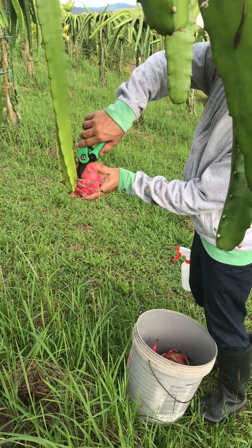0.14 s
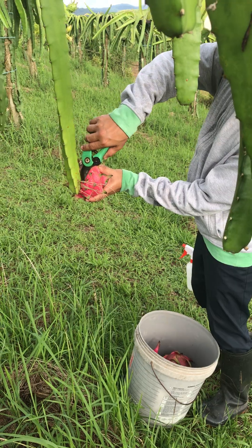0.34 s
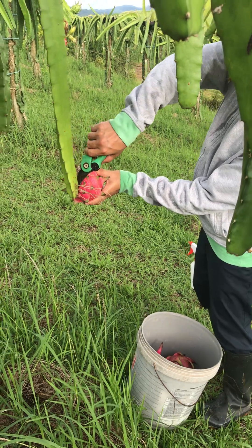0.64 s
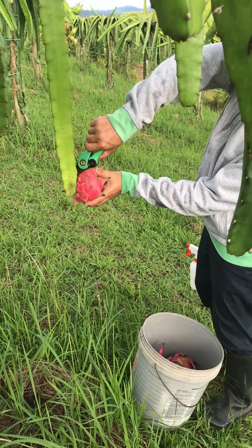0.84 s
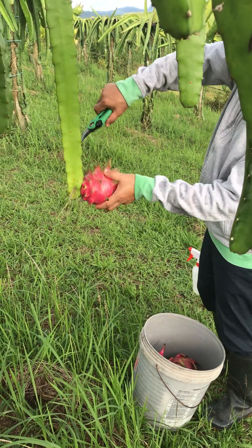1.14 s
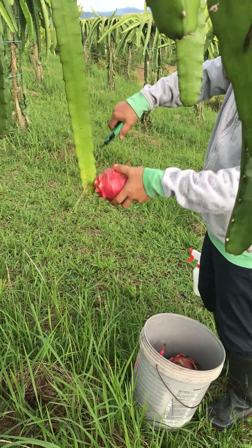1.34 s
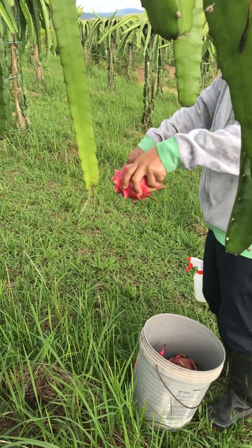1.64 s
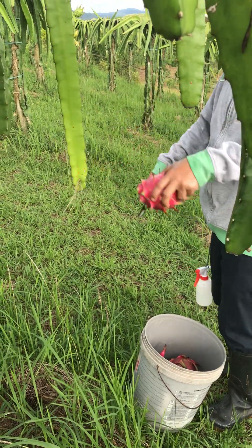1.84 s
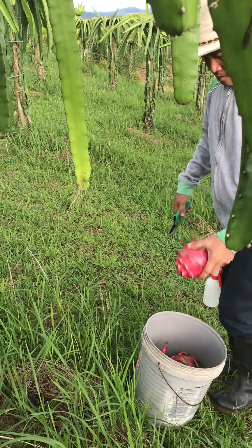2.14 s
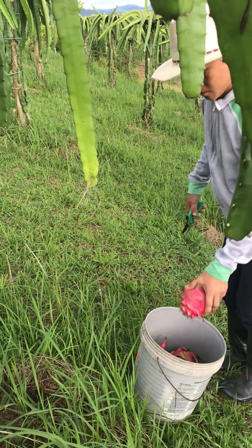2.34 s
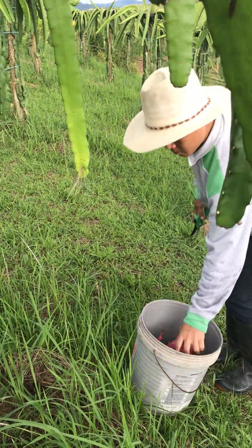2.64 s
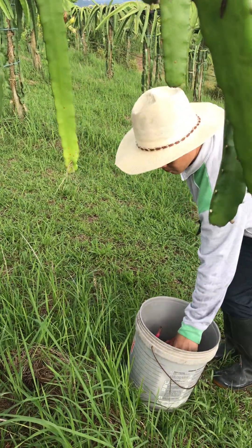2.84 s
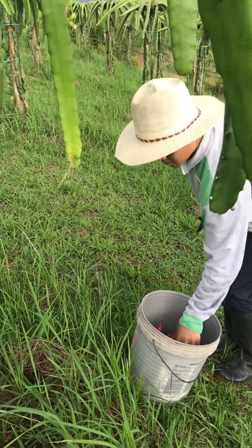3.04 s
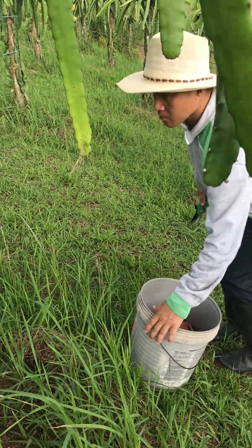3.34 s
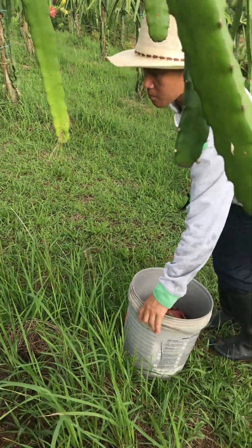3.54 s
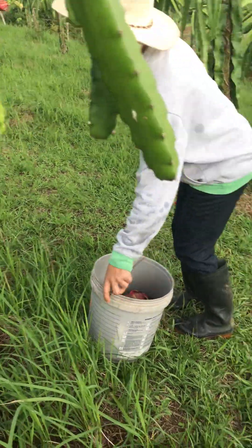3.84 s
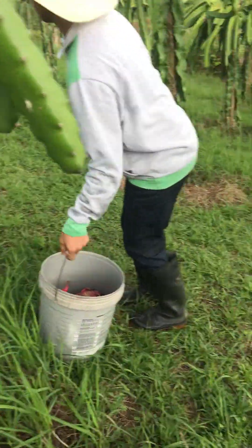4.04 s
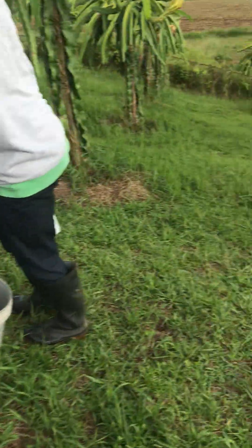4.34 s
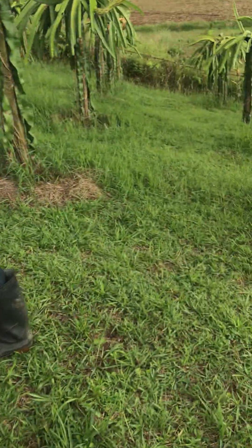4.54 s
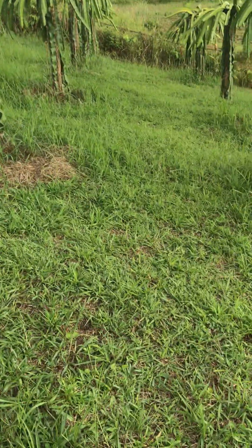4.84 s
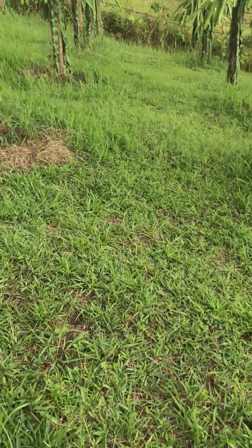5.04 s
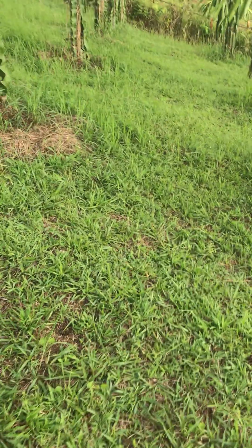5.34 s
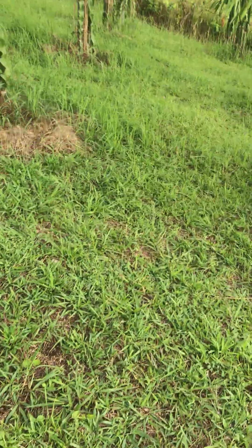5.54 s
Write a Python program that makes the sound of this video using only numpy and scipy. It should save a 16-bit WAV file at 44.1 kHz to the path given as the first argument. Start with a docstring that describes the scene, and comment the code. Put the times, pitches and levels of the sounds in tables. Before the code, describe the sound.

Outdoors in a quiet, insect-shrill field, shears make small crisp ticks, then a loud, slightly wet snap through a fruit stem. A nearby bird sings a quick fluttering phrase three times. Fruit and hand touch a plastic bucket with soft dull knocks, the handle clacks, and sleeves and boots swish through grass, getting closer. A single handheld microphone catches low breeze rumble.

```python
"""Pruning shears crack through a fruit stem in a quiet field: decaying tones and noise splinters over a wet crunch.
The fruit goes into a plastic bucket, whose handle is lifted; knocks and rubbing ring its wall modes.
A bird calls three times among fainter ones, all gliding sines with a trembling pitch.
Insects shrill, and sleeves and boots rustle through the grass: shaped noise and dense clicks.
A light breeze rumbles on the single microphone as swelling low noise."""
import sys
import numpy as np
from scipy import signal
from scipy.fft import rfft, irfft, next_fast_len
from scipy.io import wavfile
from scipy.ndimage import uniform_filter1d, map_coordinates

SR = 44100
rng = np.random.default_rng(int(sys.argv[2]) if len(sys.argv) > 2 else 0)


def put_to_file(sound):
    """Save the sound as 16-bit audio at rate SR, in the file named by the first command-line argument."""
    columns = np.atleast_2d(sound).T  # one column per channel
    safe = np.clip(columns, -1, 1)
    whole_steps = np.round(safe * 32767)
    wavfile.write(sys.argv[1], SR, whole_steps.astype(np.int16))


N = 251350

# cracks of stem and blades: [t/s, ring level/dB, ring f/Hz, splinter trim/dB, lowest strong f/Hz]
CRACKS = [(0.6135, -21.5, 7600, 4, 2100), (0.6167, -22, 2220, 3, 1880), (0.7681, -21.5, 7170, -4, 2060),
          (.8193, -31.5, 8100, 4, 6000), (0.8345, -26.5, 6960, 6.5, 2200), (0.8367, -25.5, 6900, 10, 2460),
          (0.84, -19, 6860, 6, 2780), (0.8409, -10.5, 2840, 0, 2370), (0.8434, -21.5, 4300, 6, 2700),
          (1.5101, -32.5, 4260, 6.5, 1130)]
PARTING_S = max(CRACKS, key=lambda crack: crack[1])[0]  # the loudest crack severs the stem
# modes of the bucket wall: [f/Hz, relative level/dB, t60/s]
BUCKET_MODES = [(272.6, 2.5, 0.032), (486, -25, 0.01), (674, -7, 0.052), (947, -5, 0.031),
                (1101, -4, 0.044), (1420, 9.5, 0.0084), (1610, -18.5, 0.0065), (1950, -6, 0.01),
                (2380, -11.5, 0.029), (3010, 7.5, 0.0026), (3580, 0, 0.01)]


def amp(db):
    """Amplitude factor of a level in dB."""
    return 10 ** (np.asarray(db) / 20)


def unit(x):
    """x at rms 1."""
    return x / np.sqrt(np.mean(x ** 2) + 1e-20)


def wobble(rate):
    """A smooth random curve, rate knots a second."""
    return map_coordinates(rng.standard_normal(int(N * rate / SR) + 4), [np.arange(N) * rate / SR])


def filtered(x, response):
    """x times a response of frequency."""
    m = next_fast_len(N + SR // 2)
    return irfft(rfft(x, m) * response(np.fft.rfftfreq(m, 1 / SR)), m)[:N]


def coloured(x, spectrum):
    """x shaped by (Hz, dB) points, at rms 1."""
    f, db = np.transpose(spectrum)
    return unit(filtered(x, lambda hz: amp(np.interp(np.log(hz + 1), np.log(f), db))))


def noise(spectrum):
    """Coloured noise of rms 1."""
    return coloured(rng.standard_normal(N), spectrum)


def band(x, low_hz, high_hz, order):
    """x between two gentle edges."""
    edges = [min(low_hz, .9 * high_hz), min(high_hz, .48 * SR)]
    return signal.sosfilt(signal.butter(order, edges, "band", fs=SR, output="sos"), x)


def add(track, s, sound):
    """Mix a sound into the track at time s."""
    part = track[max(round(s * SR), 0):][:len(sound)]
    part += sound[:len(part)]


def fade(t, t60):
    """Free decay, 60 dB down after t60."""
    return np.exp(-np.log(1000) * t / t60)


def burst(t, t60):
    """A dying puff of noise of steady strength."""
    shape = fade(t, t60)
    puff = shape * rng.standard_normal(len(t))
    return puff * np.linalg.norm(shape) / np.linalg.norm(puff)


def scatter(x, t60, delay, top_hz):
    """Diffuse echo from ground and plants, duller than its source."""
    t = np.arange(SR // 2) / SR
    tail = burst(t, t60)
    delayed_tail = np.pad(tail / np.linalg.norm(tail), (round(delay * SR), 0))
    echo = signal.fftconvolve(x, delayed_tail)[:N]
    return filtered(echo, lambda hz: 1 / np.hypot(1, hz / top_hz))


def swells(rows):
    """Summed strength of (start, rise, fall, dB) swells; each climbs 20 dB in its rise and loses 20 dB in its fall."""
    t = np.arange(N) / SR
    power = np.zeros(N)
    for s, rise, fall, db in rows:
        peak = s + rise
        distance = np.abs(np.maximum((peak - t) / rise, (t - peak) / fall))
        power += amp(db - 20 * distance ** 1.4) ** 2  # an exponent above 1 rounds the top
    return np.sqrt(power)


def crackle(spectrum, rate, spread_db, smooth):
    """Many blades or fibres flicking past each other: tiny clicks of unequal size on a smooth hiss."""
    sizes = amp(spread_db * np.minimum(rng.exponential(size=N), 5))
    clicks = (rng.random(N) < rate / SR) * rng.standard_normal(N) * sizes
    return coloured(unit(clicks) + smooth * rng.standard_normal(N), spectrum)


def note(contour, length, hoarse, swell_db, overtone_db):
    """A bird's glide through evenly spaced pitches; it starts hoarse and clears up."""
    u = np.linspace(0, 1, int(length * SR))
    pitch = np.exp(np.interp(u, np.linspace(0, 1, len(contour)), np.log(contour)))
    tremor = map_coordinates(rng.standard_normal(SR // 100), [u * length * 600])
    depth = 0.022 + hoarse * (1 - u) ** 2
    phase = 2 * np.pi * np.cumsum(pitch * (1 + depth * tremor)) / SR
    shape = np.abs(np.sin(np.pi * u)) ** .48 * amp(swell_db * (u - .5))
    return shape * (np.sin(phase) + amp(overtone_db) * np.sin(2 * phase))


def field():
    """Insects, a blur of very distant birds, still air and the breeze on the microphone, all as shaped noise."""
    # insect level over time: [t/s, level/dB]
    shrill = [(0, -66.5), (1.2, -65.5), (3.4, -66), (4.2, -67.5), (5.7, -76)]
    # spectra of insects, distant birds, air, the microphone's own noise and breeze: [f/Hz, relative level/dB]
    insect_spectrum = [(6700, -25.5), (7100, -11.5), (7300, -0.5), (7550, -10.5), (7850, -4.5),
                       (8500, -22.5), (9500, -30.5), (10400, -12.5), (10800, -2.5), (11400, -7),
                       (12200, -26), (14000, -27)]
    chorus_spectrum = [(1800, -19.5), (2600, 3.5), (3200, 0.5), (3600, -1.5), (4500, -18)]
    air_spectrum = [(71, -26), (120, -2.5), (296, -16.5), (355, -18), (891, -26.5), (1090, -22.5),
                    (1490, -29), (1650, -27.5), (1890, -33.5), (6500, -56.5), (8450, -62), (14300, -120)]
    hiss_spectrum = [(2000, 1.5), (5000, -8.5), (15000, -3.5)]
    rumble_spectrum = [(18, -18.5), (35, -6), (58, 1.5), (85, -3.5), (140, -14), (220, -25.5), (500, -58)]
    # gusts on the microphone: [start t/s, rise/s, fall/s, level/dB]
    gusts = [(-.15, 0.32, .4, -51.5), (.25, 0.35, 0.098, -55), (1.38, 0.31, .11, -56),
             (1.88, 0.098, 0.15, -58), (2.52, 0.11, 0.064, -56), (3.15, 0.13, 0.58, -58.5),
             (3.57, 0.088, 0.11, -46), (4.1, .15, .6, -58.5), (4.8, 0.33, 0.55, -60.5)]
    shrill_db = np.interp(np.arange(N) / SR, *np.transpose(shrill))
    insects = amp(shrill_db + 0.42 * wobble(8.7)) * noise(insect_spectrum)
    chorus = amp(-79.5 + 2.2 * wobble(2.1)) * noise(chorus_spectrum)
    air = amp(-68.5 + 0.92 * wobble(3.07)) * noise(air_spectrum)
    hiss = amp(-77.5) * noise(hiss_spectrum)
    light_air = amp(-65 + 2 * wobble(20))  # between gusts
    breeze = np.hypot(light_air, swells(gusts)) * noise(rumble_spectrum)
    return insects + chorus + air + hiss + breeze


def far_birds():
    """Thin gliding whistles, scoops, chirps and pips, with much echo."""
    # slow whistles and two low faint coos: [t/s, length/s, start f/Hz, end f/Hz, level before echo mix/dB]
    whistles = [(0, 0.029, 1760, 2670, -57.5), (.075, 0.018, 2860, 2740, -56),
                (0.128, 0.097, 2434, 3760, -59), (.152, .012, 3950, 4080, -66),
                (.397, 0.053, 1107, 1130, -69.5), (0.412, 0.054, 3840, 3620, -68),
                (2.634, 0.13, 2670, 4070, -62), (2.699, 0.024, 2344, 1877, -52),
                (2.755, 0.054, 2900, 1850, -60), (2.932, 0.095, 650, 670, -67.5),
                (2.968, 0.174, 3230, 3074, -66.5),            (3.664, 0.053, 2800, 3570, -62)]
    # a call that scoops up and sags: [t/s, level before echo mix/dB], and its evenly spaced pitches [f/Hz]
    scoops = [(.36, -63.5), (.693, -61)]
    scoop_hz = [2764, 3770, 4000, 3850, 3900]
    # a hoarse falling chirp: [t/s, level before echo mix/dB], and its evenly spaced pitches [f/Hz]
    chirps = [(1.042, -57.5), (1.313, -54)]
    chirp_hz = [4300, 2750, 2490, 2055, 1710]
    # a tiny high pip: [t/s, level before echo mix/dB], and its evenly spaced pitches [f/Hz]
    pips = [(4.01, -54), (4.097, -53), (4.154, -52.5)]
    pip_hz = [8070, 7420, 6850]
    out = np.zeros(N)
    for s, length, start_hz, end_hz, db in whistles:
        add(out, s, amp(db) * note([start_hz, end_hz], length, hoarse=0.049, swell_db=-3, overtone_db=-21))
    for s, db in scoops:
        add(out, s, amp(db) * note(scoop_hz, length=.06, hoarse=0.093, swell_db=-12, overtone_db=-22))
    for s, db in chirps:
        add(out, s, amp(db) * note(chirp_hz, length=0.029, hoarse=0.216, swell_db=5, overtone_db=-16))
    for s, db in pips:
        add(out, s, amp(db) * note(pip_hz, length=.013, hoarse=0.034, swell_db=7, overtone_db=-25))
    return amp(-3) * out + amp(-3.5) * scatter(out, t60=0.25, delay=0.0041, top_hz=4500)


def shears():
    """Fibres give way one by one, then the blades snap shut and the fruit jolts free."""
    # modes of fruit and stub as they part: [f/Hz, level before the jolt builds up/dB, t60/s]
    fruit_modes = [(201, -47.5, 0.075), (367, -40, 0.031), (520, -44.5, 0.027), (854, -38, 0.049),
                   (2100, -29, 0.014), (2290, -26, 0.027), (3640, -24, 0.019), (4100, -37, 0.022),
                   (5300, -35, .015)]
    rings, splinters, t = np.zeros(N), np.zeros(N), np.arange(SR // 8) / SR
    for s, db, hz, splinter_db, low_hz in CRACKS:
        ring = np.sin(2 * np.pi * hz * t) * fade(t, t60=0.0038)
        ring = band(ring, 0.55 * hz, high_hz=19000, order=2)
        add(rings, s, amp(db) * ring)
        splinter = band(burst(t, t60=0.0043), low_hz, high_hz=19600, order=2)
        add(splinters, s, amp(db + splinter_db - 2.5) * splinter)
    jolt = np.zeros(len(t))
    for hz, db, t60 in fruit_modes:
        jolt += amp(db) * np.sin(2 * np.pi * (hz * t + rng.random())) * fade(t, t60)
    add(rings, PARTING_S, jolt * (1 - fade(t, t60=0.0055)))  # the jolt builds up softly
    near = amp(-5.5) * scatter(splinters + 0.54 * rings, t60=0.037, delay=0.001046, top_hz=11000)
    far = amp(-18.5) * scatter(splinters, t60=0.33, delay=0.0091, top_hz=5440)
    return rings + splinters + near + far


def torn_stem():
    """Wet fibres crunch around the cut: dense clicks swell into the loudest crack and die after it."""
    # spectrum of the crunch: [f/Hz, relative level/dB]
    tear_spectrum = [(120, 0), (300, 2.5), (800, -3.5), (2500, 4.5), (5000, -6), (14000, -14)]
    rise_s, fall_s, level_db = 0.008, 0.04, -42.5
    strength = swells([(PARTING_S - rise_s, rise_s, fall_s, level_db)])
    return strength * crackle(tear_spectrum, rate=2500, spread_db=4, smooth=1.0)


def bucket():
    """Soft, broad blows reach the low wall modes, small hard ones mostly the high; each contact scrapes a little."""
    # knocks and scrapes of fruit, hand and handle: [t/s, blow level/dB, lowest strong f/Hz, scrape time to peak/s]
    knocks = [(0.925, -49, 736, 0.0032), (2.721, -49, 1710, 0.0055), (3.004, -55, 1004, 0.0033),
              (3.035, -54.5, 800, 0.0035), (3.402, -48.5, 825, 0.003), (3.458, -38.5, 800, 0.0022),
              (3.553, -52, 960, 0.014), (3.682, -49.5, 600, 0.0084), (3.731, -37.5, 980, 0.003),
              (4.204, -51.5, 583, 0.0071), (4.374, -29, 212, 0.0016), (4.405, -42.5, 2610, 0.0022),
              (5.188, -45.5, 298, 0.0025), (5.473, -38, 1660, 0.0023)]
    width_hz, leak = 1720, 0.21  # band that a blow excites; share that reaches the modes below it
    out, t = np.zeros(N), np.arange(SR // 4) / SR
    hz, mode_db, t60 = np.transpose(BUCKET_MODES)[:, :, None]
    for s, db, low_hz, length in knocks:
        high_hz = low_hz + width_hz
        above_low = 1 / np.hypot(1, (low_hz / hz) ** 2)
        reach = np.hypot(leak, above_low) / np.hypot(1, (hz / high_hz) ** 3)
        strength = reach * amp(mode_db + rng.normal(0, 4.4, hz.shape))
        swell = 1 - np.exp(-t / (1.1 / hz + 0.55 * length))  # low modes and slow contacts build up later
        tones = np.sin(2 * np.pi * (hz * t + rng.random(hz.shape)))
        modes = strength * swell * fade(t, t60 + 1.4 * length) * tones  # slow contacts also ring longer
        pressure = t / length * np.exp(1 - t / length)
        scrape = pressure * unit(band(rng.standard_normal(len(t)), 0.71 * low_hz, 0.96 * high_hz, order=2))
        add(out, s, amp(db) * (modes.sum(0) + amp(-5) * scrape))
    return out + amp(-20) * scatter(out, t60=0.1, delay=0.0072, top_hz=4000)


def grass():
    """Blades swish past cloth and boots, cloth rubs, stalks are crushed and a few snap."""
    # sweeps of arms and boots: [start t/s, rise/s, fall/s, swish level before a 3 dB lift/dB, crush over swish/dB]
    sweeps = [(1.371, 0.047, .05, -62.5, -21), (1.61, 0.018, 0.044, -76.5, 3.5),
              (1.8, 0.35, 0.14, -63.5, -9.5), (2.1, 0.18, 0.12, -56, -7), (2.7, 0.06, 0.18, -68, -3),
              (2.895, 0.027, 0.053, -68.5, 1), (3.08, 0.03, 0.018, -69.5, 6.5),
              (3.19, .07, 0.15, -61.5, -4), (3.62, 0.095, 0.25, -53, -5.5),
              (3.84, 0.087, 0.13, -58.5, -4.5), (4.18, .18, 0.16, -56.5, -4),
              (4.5, 0.13, 0.19, -59.5, -9.5), (4.68, 0.37, 0.077, -53, 0), (5.079, 0.09, 0.12, -50, -9),
              (5.251, 0.081, 0.038, -50, -5.5), (5.379, 0.15, 0.26, -46, -5.5)]
    # stalks snapping: [t/s, level before a 12 dB lift/dB, lowest strong f/Hz]
    stalks = [(2.761, -58, 1950), (3.114, -50, 2500), (4.406, -48, 3000), (4.444, -42, 10500),
              (5.174, -57, 4300), (5.325, -36.5, 6550), (5.343, -41, 1380), (5.594, -36, 4030)]
    # spectra of swish, crushed stalks and cloth rub: [f/Hz, relative level/dB]
    swish_spectrum = [(3000, -39), (6500, -12), (9000, -4.5), (10500, -6.5), (13000, -1), (16000, -4)]
    crush_spectrum = [(900, -3.5), (2000, -4), (4000, 0.5), (6500, 1.5), (9000, -7.5), (14000, -14)]
    rub_spectrum = [(90, -7), (250, 0), (430, -1), (700, -1), (1400, -1.5), (2200, -4.5), (4000, -11)]
    # a rustle between the sweeps, ever nearer: it fades in over 0.27 s and grows 7.5 dB a second
    walked_s = np.arange(N) / SR - 2.12
    wading = np.clip(walked_s / 0.27, 0, 1) * amp(-83.5 + 7.5 * walked_s)
    swish_rows = [(s, rise, fall, db) for s, rise, fall, db, _ in sweeps]
    crush_rows = [(s, rise, fall, db + over) for s, rise, fall, db, over in sweeps]
    swish = np.hypot(wading, swells(swish_rows))
    crush = np.hypot(amp(-3) * wading, swells(crush_rows))
    effort = np.abs(uniform_filter1d(swish, int(0.32 * SR)))  # smoothed over 0.32 s
    rub = effort ** .6 * amp(-30.5 + 1.8 * wobble(30))  # the power makes cloth swing less than the grass
    catching = wobble(45)  # blades catch and slip
    out = swish * amp(3.0 + 1.33 * catching) * crackle(swish_spectrum, rate=1100, spread_db=3.5, smooth=1.37)
    out += crush * amp(3.0 + catching) * crackle(crush_spectrum, rate=900, spread_db=2.5, smooth=1.36)
    out += rub * crackle(rub_spectrum, rate=300, spread_db=-1.5, smooth=1.5)
    t = np.arange(SR // 50) / SR
    for s, db, low_hz in stalks:
        add(out, s, amp(db + 12) * band(burst(t, t60=0.0017), low_hz, high_hz=16000, order=2))
    return out


def near_bird():
    """One fluttering phrase of gliding notes sung three times, smeared by the rows of plants."""
    # a broken falling note and a quick run of down-strokes, pitched before the call's ratio:
    # [t from call start/s, length/s, start f/Hz, end f/Hz, level relative to call/dB, swell/dB]
    phrase = [(.002, 0.0072, 2590, 2175, -2, -5), (.01, 0.0112, 2106, 1510, -10, 0),
              (0.018, 0.0089, 1447, 1390, -10.5, -5), (.055, .011, 2900, 2750, -8, -2),
              (0.068, .013, 3400, 2975, -1.5, 13), (.085, .012, 3450, 3150, 1, -6),
              (0.1, .011, 3514, 2950, 0.5, 2), (.113, .009, 2840, 2330, 2, -13)]
    # the calls: [t/s, level before echo mix/dB, pitch ratio]
    calls = [(1.629, -47, .95), (1.943, -42.5, 0.98), (2.242, -41.5, 1.03)]
    out = np.zeros(N)
    for start, call_db, ratio in calls:
        for s, length, start_hz, end_hz, db, swell_db in phrase:
            contour = [ratio * start_hz, ratio * end_hz]
            stroke = note(contour, length, hoarse=0.055, swell_db=swell_db, overtone_db=-27)
            add(out, start + s, amp(call_db + db) * stroke)
    out += amp(-17.5) * np.roll(out, round(.0042 * SR))  # the ground bounce beats against each glide
    out += amp(-12.5) * scatter(out, t60=0.022, delay=0.00199, top_hz=9000)  # the nearest plants roughen it
    near = amp(-4) * scatter(out, t60=0.25, delay=0.008, top_hz=7880)
    far = amp(-18.5) * scatter(out, t60=7.2, delay=0.031, top_hz=6000)
    return amp(-0.5) * out + near + far


def brushed_bucket():
    """Friction on the wall keeps its modes murmuring."""
    # sleeve, leg and grass sliding on the bucket: [start t/s, rise/s, fall/s, level/dB]
    brushes = [(2.88, 0.054, 0.28, -63.5), (3.12, .13, .08, -61.5), (3.35, 0.049, 0.18, -67),
               (3.6, 0.082, 0.073, -76), (4.48, 0.097, 0.56, -57.5), (5.05, 0.12, 0.16, -58.5),
               (5.4, 0.034, 0.071, -56)]
    # spectrum of the friction that drives the wall: [f/Hz, relative level/dB]
    friction_spectrum = [(120, -5), (260, -4.5), (800, -3.5), (1500, -1), (2400, 3), (4500, -10)]
    t = np.arange(SR // 6) / SR
    wall = np.zeros(len(t))
    for hz, db, t60 in BUCKET_MODES:
        wall += amp(db) * np.sin(2 * np.pi * (hz * t + rng.random())) * fade(t, t60)
    friction = crackle(friction_spectrum, rate=400, spread_db=2, smooth=1.0)
    murmur = unit(signal.fftconvolve(friction, wall)[:N])
    return swells(brushes) * amp(1.2 * wobble(45)) * murmur


def scene():
    """Everything reaches one microphone, heard alike on both channels."""
    background = field() + far_birds() + near_bird()
    harvest = shears() + torn_stem() + bucket() + brushed_bucket() + grass()
    mono = background + harvest
    return np.array([mono, mono])


def record(dry):
    """The recorder cuts steeply above its band limit."""
    steep = signal.ellip(12, .1, 80, 15950, fs=SR, output="sos")  # ripple dB, stopband dB, edge Hz
    return signal.sosfilt(steep, dry)


dry = scene()
out = record(dry)
put_to_file(out)
```